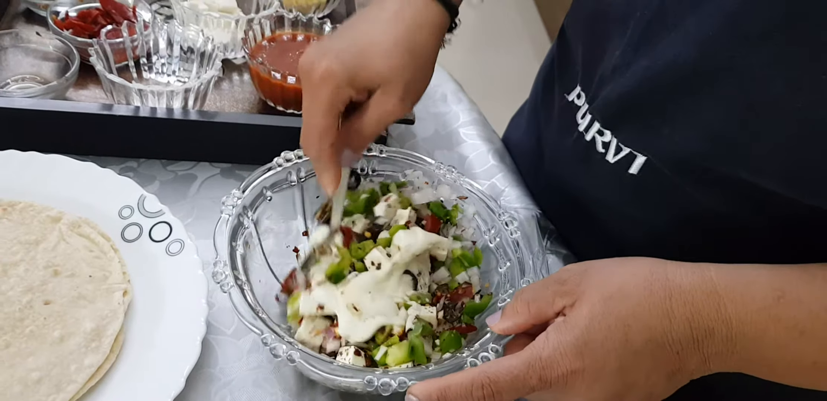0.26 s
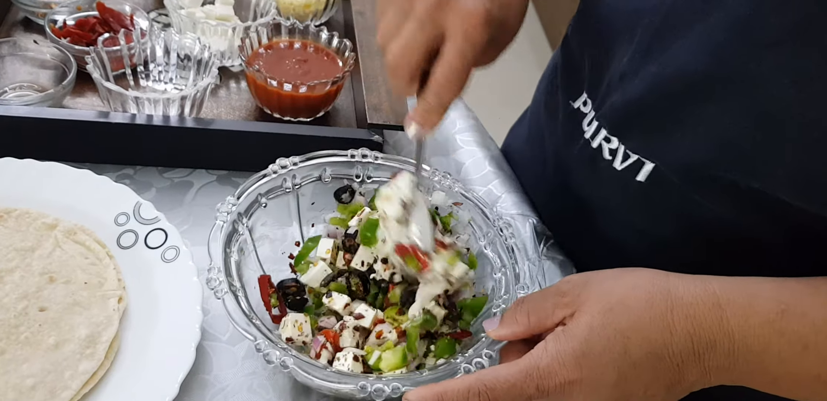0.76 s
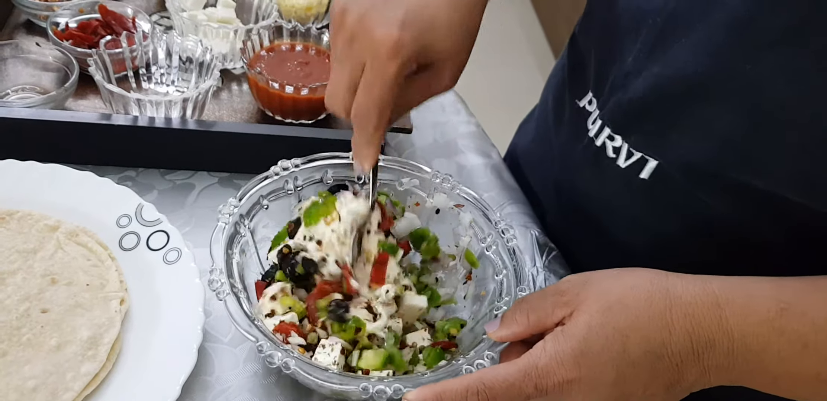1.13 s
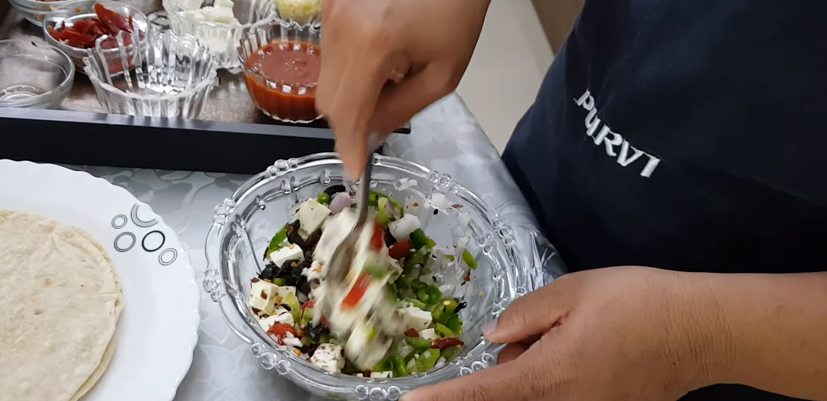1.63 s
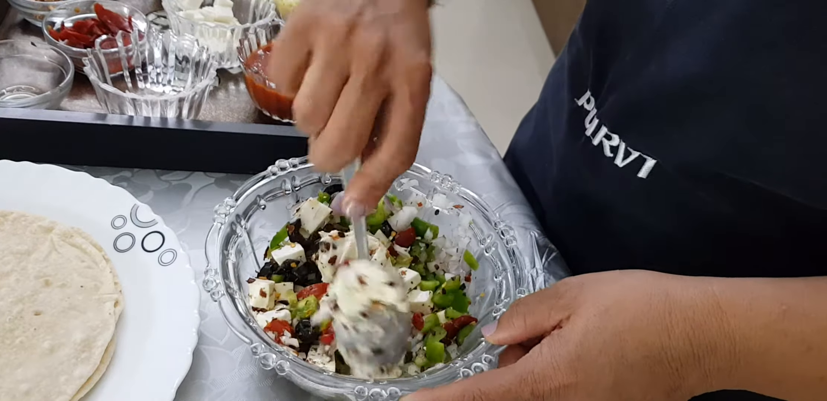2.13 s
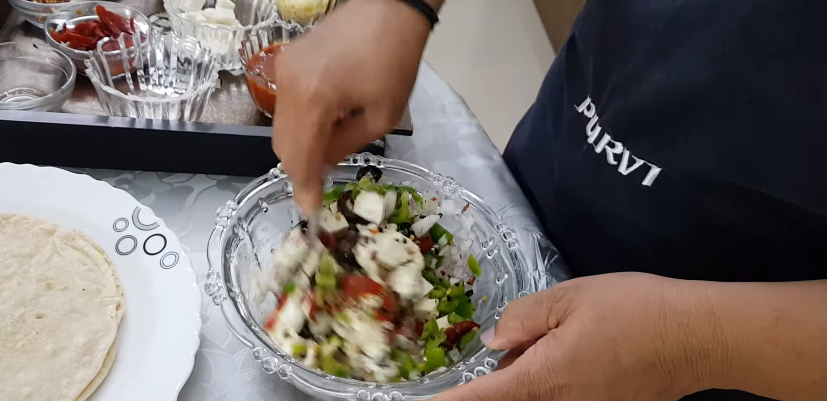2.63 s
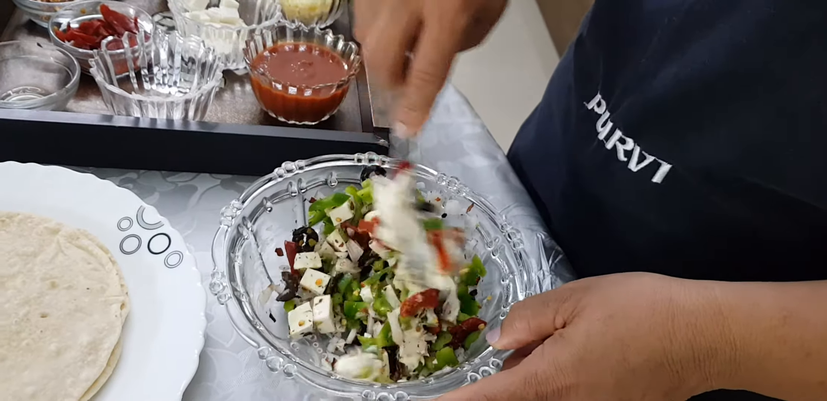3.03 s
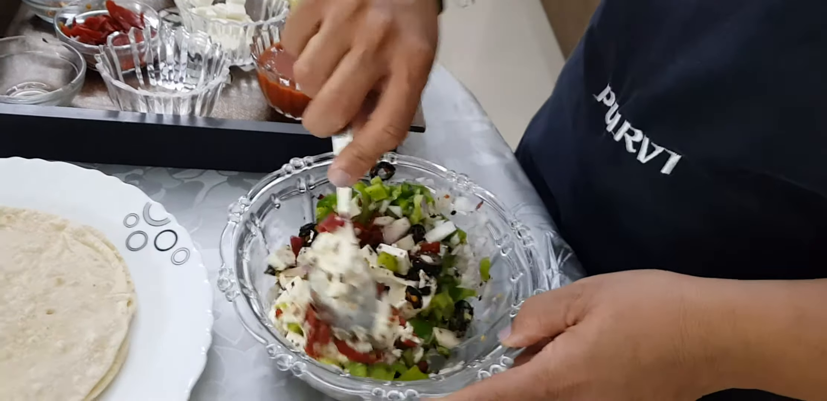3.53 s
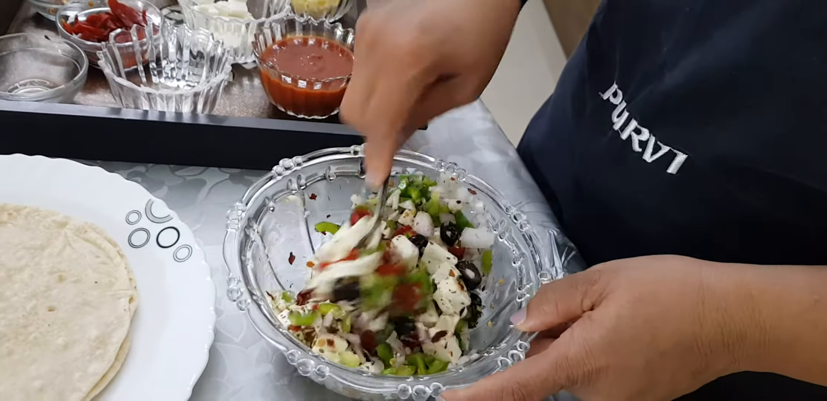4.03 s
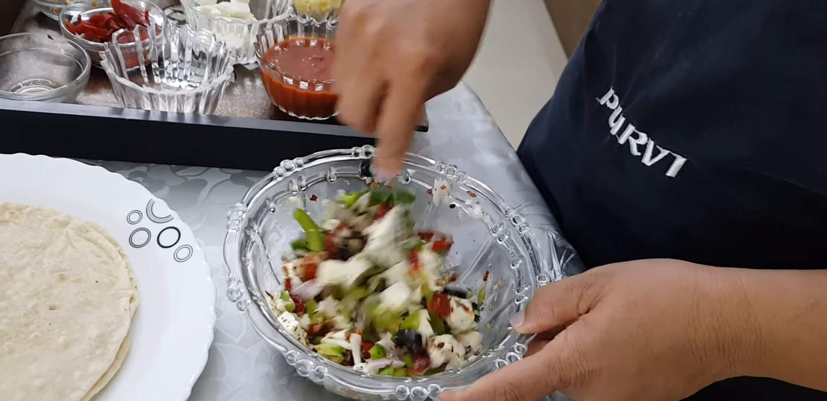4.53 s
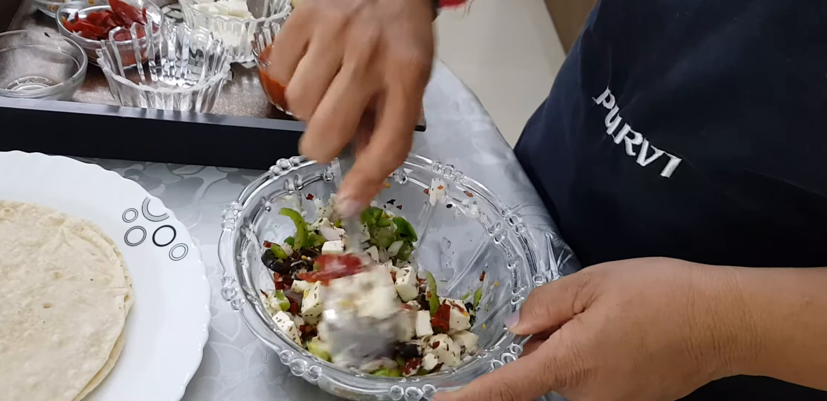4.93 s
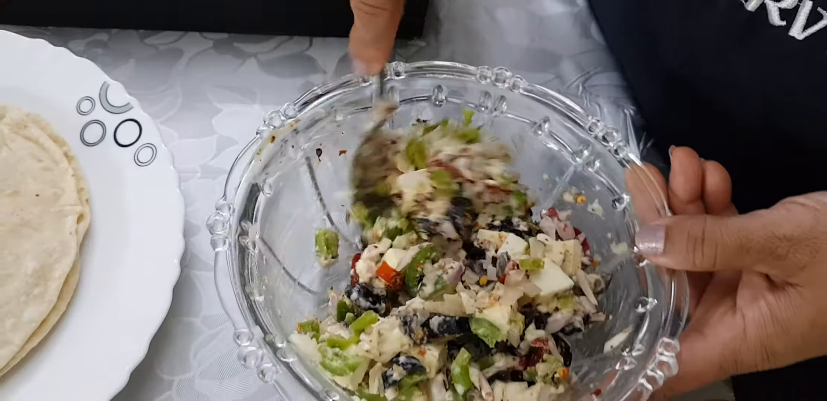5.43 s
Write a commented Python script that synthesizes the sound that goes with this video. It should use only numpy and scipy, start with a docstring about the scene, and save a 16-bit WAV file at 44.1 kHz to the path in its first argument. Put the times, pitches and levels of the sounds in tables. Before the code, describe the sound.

A metal spoon clinks irregularly against a glass bowl over faint wet mixing squelches in a bare, ringing kitchen, with one low microphone bump.

```python
"""Spoon clinks on a cut-glass bowl, damped by food and a hand, over wet squelches in a bare, ringing kitchen.
A steel spoon folds chopped vegetables and soft cheese: each clink sums struck modes of glass and steel and a noisy clack.
Filtered noise bursts make the counter knocks, wet smacks and one scrape; gated random pops make the squelch.
Noise echoes form the room, shaped noise its low drone and the hiss; microphone bumps are bass-cut, dying sines."""
import sys
import numpy as np
from scipy import signal
from scipy.fft import rfft, irfft, next_fast_len
from scipy.io import wavfile

SR = 44100
rng = np.random.default_rng(int(sys.argv[2]) if len(sys.argv) > 2 else 0)


def master_out(mix):
    """Clip the mix to full scale and print it as 16-bit PCM to the path in sys.argv[1]."""
    frames = np.transpose(np.atleast_2d(mix))
    ceiling = np.clip(frames, -1, 1)
    pcm = np.round(ceiling * 32767).astype(np.int16)
    wavfile.write(sys.argv[1], SR, pcm)


N = 249854
LEAD = SR // 10   # samples before time zero, so that a sound may already be under way
BLOW_T = np.arange(SR // 3) / SR   # time axis of one blow, s
BANDS = np.geomspace(100, 16000, 64)   # Hz

# Spoon strokes through the wet mix. Each row: middle in seconds, half length in seconds, level in dB.
STROKES = [(0.972, 0.086, -59.5), (1.423, 0.1, -65.5), (2.37, .18, -67.5), (2.658, 0.038, -60.5),
           (3.244, 0.087, -61.5), (3.653, 0.036, -61), (4.053, .075, -65.5), (4.922, .072, -64.5),
           (5.341, .025, -55.5)]
# Colour of the wet mix. Each row: frequency in Hz, relative level in dB per Hz.
SQUELCH = [(500, -7.5), (1500, 3.5), (2800, -11), (4000, -6.5), (5700, -4.5), (7700, -9), (9700, -5.5),
           (13000, -7.5), (16000, -12)]


def from_db(db):
    """Decibels to gain."""
    return 10 ** (np.asarray(db) / 20)


def at_hz(points, hz):
    """Read a table on a log-frequency axis."""
    f, value = np.transpose(points)
    return np.interp(np.log(np.maximum(hz, 1)), np.log(f), value)


def unit_energy(x):
    """Scale each channel to an energy of one."""
    return x / np.sqrt(np.sum(x ** 2, axis=-1, keepdims=True) / SR + 1e-30)


def unit_rms(x):
    """Scale to an rms of one over all channels."""
    return x / np.sqrt(np.mean(x ** 2) + 1e-30)


def dying(t, t60):
    """Envelope that falls 60 dB in t60 seconds."""
    return np.exp(-np.log(1000) * t / t60)


def pan(db):
    """Left and right gains for a left-minus-right level difference."""
    return from_db([[db / 2], [-db / 2]])


def add(track, s, sound):
    """Mix a sound at s seconds into a track that starts LEAD samples before time zero."""
    i = max(LEAD + round(s * SR), 0)
    track[:, i:i + sound.shape[-1]] += sound[:, :track.shape[1] - i]


def favour(hz, centre_hz, octaves):
    """A bell over log frequency, one at its centre."""
    return np.exp(-(np.log2(hz / centre_hz) / octaves) ** 2 / 2)


def shaded(spectrum, extra_db):
    """A spectrum with extra decibels on each of the BANDS."""
    return np.column_stack([BANDS, at_hz(spectrum, BANDS) + extra_db])


def colour(x, spectrum):
    """Causal (minimum-phase) filter with the given spectrum, built by folding its cepstrum."""
    n = 2 * next_fast_len(x.shape[-1] // 2 + 2048)
    gain = from_db(at_hz(spectrum, np.fft.rfftfreq(n, 1 / SR)))
    cepstrum = irfft(np.log(gain))
    cepstrum[1:n // 2] *= 2
    cepstrum[n // 2 + 1:] = 0
    response = np.exp(rfft(cepstrum))
    return irfft(rfft(x, n) * response)[..., :x.shape[-1]]


def diffuse_noise(size):
    """Frequencies and stereo spectrum of noise from all sides: alike in the bass, unrelated in the treble."""
    # Each row: frequency in Hz, left-right likeness from 0 to 1.
    likeness = [(30, 0.74), (130, 0.91), (290, 0.91), (640, 0.58), (1400, 0), (16000, 0)]
    hz = np.fft.rfftfreq(size, 1 / SR)
    alike = np.clip(at_hz(likeness, hz), -1, 1)
    mid, side = rfft(rng.standard_normal((2, size)))
    shared, opposed = np.sqrt(1 + alike) * mid, np.sqrt(1 - alike) * side
    return hz, (shared + opposed * [[1], [-1]]) / np.sqrt(2)


def burst(spectrum, t60, rise_s=0.00037):
    """A short coloured noise crack of unit energy."""
    size = SR // 8
    t = BLOW_T[:size]
    noise = irfft(diffuse_noise(size)[1], size)
    cracked = noise * dying(t, t60) * (1 - np.exp(-t / rise_s))
    return unit_energy(colour(cracked, spectrum))


def ring(modes, extra_db, contact_s, damping=1):
    """Struck modes; each reaches the two microphones with its own phase and strength."""
    spread_db = 1.2
    hz, db, t60 = np.transpose(modes)
    waves = unit_energy(dying(BLOW_T, t60[:, None] / damping)) * np.exp(2j * np.pi * hz[:, None] * BLOW_T)
    strength = from_db(db + extra_db + spread_db * rng.standard_normal((2, len(hz))))
    phase = np.exp(2j * np.pi * rng.random((2, len(hz))))
    soft_start = 1 - np.exp(-(BLOW_T / contact_s) ** 2)
    return np.sqrt(2) * ((strength * phase) @ waves).imag * soft_start


def clinks():
    """Touches ring bowl and spoon and clack; force and rim brighten, the spot favours a band, one band is weaker."""
    # Spoon meets glass. Each row: start in seconds, strength in dB, spoon ring against bowl ring in dB,
    # extra for the rim mode in dB, band the spot favours in Hz, band in which this clink's rings are weaker, in Hz.
    touches = [(-0.030, -38, -15, 7.5, 4850, 2720), (0.087, -63, 22, 10, 4200, 12500),
               (1.371, -65.5, 4.5, -18, 3400, 8490), (1.708, -33, -23, -6, 4500, 3504),
               (2.226, -56, -20, 1, 9800, 2700), (2.404, -70.5, 17, 4, 2088, 4150),
               (3.715, -54, -17, -3, 5100, 2750), (3.748, -41, 10, 4, 4100, 6480),
               (4.5183, -39, 10, -1, 1756, 9100), (5.014, -41, -11, 14, 10400, 2450),
               (5.022, -49, -18, 20, 10300, 6850), (5.1291, -51.5, -10, 1, 4800, 6850),
               (5.2771, -62.5, -2, 3, 2200, 8420)]
    # Glass bowl, then finger-damped spoon. Each row: mode in Hz, relative energy in dB, t60 in seconds
    # (the bowl's before the pressing spoon shortens it).
    bowl_modes = [(723, -25.5, 0.095), (1067.5, -15, 0.17), (1930, -22, .025), (2180, -37.5, .025),
                  (2720, -3.5, 0.079), (3690, -29.5, .025), (4880, -15.5, .07), (4878, -9, 0.042),
                  (5590, -17, .012), (6850, -14, .05), (9446, -10.5, 0.047), (10030, -18.5, 0.02),
                  (8964, -18.5, 0.023), (9980, -15.5, .022), (10550, -19, .035), (10960, -26, 0.018),
                  (11830, -20, 0.03), (13400, -19.5, .012), (14900, -18.5, .01), (15700, -27.5, .03)]
    spoon_modes = [(1284, -19, 0.092), (1880, -12.5, 0.013), (2715, -18.5, .006), (4122, -6, 0.019),
                   (4500, -14, 0.01), (6300, -21, 0.0051), (8410, -7.5, .005), (9220, 1.5, 0.01),
                   (12260, -26, 0.0092), (13670, -13.5, .004)]
    # Dead clack of the contact. Each row: frequency in Hz, relative level in dB per Hz.
    clack_colour = [(100, -15.5), (300, -16.5), (700, -9.5), (1100, 2.5), (1500, -8.5), (1950, -3.5),
                    (2600, -8), (3200, -11), (4500, -6), (6000, -9), (9000, -18), (13000, -17.5),
                    (16000, -35)]
    # Drift of the clinks to the right. Each row: time in seconds, left-minus-right level in dB.
    drift = [(1.7, 2.5), (3.7, -1.5), (5.3, -2)]
    firm_db = -41   # strength of a firm clink
    tilt_db_per_oct, tilt_per_force_db, tilt_per_rim_db = 1.0, 0.065, 0.12
    firm_spot_db, spot_per_force_db = 7, .14   # the favoured band grows as a touch gets lighter
    weaker_db = -8
    clack_bowl_db, clack_spoon_db = -4.5, 1   # a firm clink's clack against each ring
    clack_follows = 0.8   # share of the rings' dB swing that the clack follows

    out = np.zeros((2, LEAD + N))
    bowl_hz, spoon_hz = np.array(bowl_modes)[:, 0], np.array(spoon_modes)[:, 0]
    rim_mode = np.arange(len(bowl_modes)) == 1
    for s, db, spoon_db, rim_db, spot_hz, weaker_hz in touches:
        force_db, pressed = db - firm_db, from_db(spoon_db)
        bowl, spoon = from_db(db) * np.array([1, pressed]) / np.hypot(1, pressed)
        clack = np.hypot(bowl * from_db(clack_bowl_db), spoon * from_db(clack_spoon_db))
        clack = clack * from_db((clack_follows - 1) * force_db)
        bright_db = tilt_db_per_oct + tilt_per_force_db * force_db + tilt_per_rim_db * rim_db
        spot_db = firm_spot_db - spot_per_force_db * force_db
        bowl_tone, spoon_tone, clack_tone = (
            bright_db * np.log2(hz / 4500) + spot_db * favour(hz, spot_hz, octaves=0.12)
            for hz in (bowl_hz, spoon_hz, BANDS))
        bowl_dip, spoon_dip = (weaker_db * favour(hz, weaker_hz, octaves=0.12) for hz in (bowl_hz, spoon_hz))
        damping = 1 + 1.5 * pressed   # a spoon that stays pressed on the glass chokes its ring
        bowl_extra = bowl_tone + bowl_dip + rim_db * rim_mode
        glass = bowl * ring(bowl_modes, bowl_extra, contact_s=0.00047, damping=damping)
        steel = spoon * ring(spoon_modes, spoon_tone + spoon_dip, contact_s=0.00029)
        sides = pan(np.interp(s, *np.transpose(drift)))
        add(out, s, (glass + steel) * sides)
        add(out, s, clack * burst(shaded(clack_colour, clack_tone), t60=0.022) * sides)
    return out


def knocks():
    """The foot of the rocking bowl comes down on the counter: short, dull noise bursts."""
    # Each row: start in seconds, energy in dB.
    landings = [(1.371, -64), (1.800, -47.5), (3.863, -65)]
    # Each row: frequency in Hz, relative level in dB per Hz.
    knock_colour = [(50, -17), (120, -16), (300, -2), (500, -6.5), (750, 7), (1200, -5.5), (2500, -24),
                    (8000, -34.5)]
    out = np.zeros((2, LEAD + N))
    for s, db in landings:
        add(out, s, from_db(db) * burst(knock_colour, t60=0.01))
    return out


def squelch(grains_per_band_s, size_db):
    """Wet pieces part in tiny pops, each in one of twelve pitch bands, under every stroke."""
    t = np.arange(-LEAD, N) / SR
    push = sum(from_db(db) * np.exp(-((t - s) / half) ** 2 / 2) for s, half, db in STROKES)
    edges = np.geomspace(1000, 16000, 13)   # Hz
    pops = np.zeros((2, len(t)))
    for low, high in zip(edges, edges[1:]):
        born = rng.random(len(t)) < grains_per_band_s / SR
        sizes = from_db(size_db * np.minimum(rng.exponential(1, len(t)), 4))
        sizes = sizes * rng.standard_normal((2, len(t)))
        band = signal.butter(2, [low, high], "band", fs=SR, output="sos")
        pops += signal.sosfilt(band, born * sizes + 1e-18)
    return push * unit_rms(colour(pops, SQUELCH))


def wet_burst(hz, t60, boost_db):
    """A noise burst with the colour of the wet mix and one narrow resonance."""
    return burst(shaded(SQUELCH, boost_db * favour(BANDS, hz, octaves=0.076)), t60)


def smacks(count):
    """Air pockets in the mix open: some at set times, others at random around every stroke."""
    # Wet smacks at set times. Each row: start in seconds, energy in dB, pitch in Hz.
    timed = [(0.943, -73.5, 6340), (1.35, -68, 6900), (1.545, -75, 6540), (2.581, -78.5, 9170),
             (3.119, -83, 12750), (3.192, -78.5, 4500), (4.023, -73, 11540)]
    stray_db = -20   # energy against the level of the stroke
    stray_spread = 0.99   # scatter in half lengths of the stroke
    low_hz, high_hz = 4000, 11010
    out = np.zeros((2, LEAD + N))
    strays = [(s + stray_spread * half * rng.standard_normal(), db + stray_db, rng.uniform(low_hz, high_hz))
              for s, half, db in STROKES for _ in range(count)]
    for s, db, hz in timed + strays:
        add(out, s, from_db(db) * wet_burst(hz, t60=.016, boost_db=8))
    return out


def scrape():
    """The spoon slides once along wet glass and hisses in two narrow bands."""
    # Each row: band in Hz, energy in dB.
    hissing_bands = [(5480, -74), (9700, -73.5)]
    out = np.zeros((2, LEAD + N))
    for hz, db in hissing_bands:
        add(out, 2.635, from_db(db) * wet_burst(hz, t60=0.27, boost_db=19))
    return out


def bumps(highpass_hz, left_db):
    """Pushes on the microphone case, mostly at the right port; a bass cut turns each into a dying wobble."""
    # Each row: start in seconds, peak in dB, pitch of the push in Hz.
    pushes = [(3.2885, -13, 232), (3.299, -19.5, 100), (3.327, -20, 102), (3.34, -15, 65.6),
              (3.3624, -8.5, 157), (3.818, -32.5, 69.5), (4.021, -42.5, 68)]
    # The case's own dull click. Each row: frequency in Hz, relative level in dB per Hz.
    tick_colour = [(100, 0.5), (300, -2.5), (500, -3.5), (750, 0), (1200, -24), (2500, -30.5),
                   (6000, -26.5), (9000, -40.5), (15000, -36)]
    # click against the push at this pitch; quicker pushes click harder
    tick_db, tick_at_hz, tick_db_per_oct = -44, 157, 10
    out = np.zeros((2, LEAD + N))
    bass_cut = signal.butter(5, highpass_hz, "high", fs=SR, output="sos")
    tick = unit_energy(colour(signal.unit_impulse(len(BLOW_T)), tick_colour))
    for s, db, push_hz in pushes:
        phase = 2 * np.pi * push_hz * BLOW_T
        wobble = signal.sosfilt(bass_cut, np.sin(phase) * np.exp(-.45 * phase) + 1e-18)
        add(out, s, from_db(db) * wobble / np.abs(wobble).max() * from_db([[left_db], [0]]))
        click_db = db + tick_db + tick_db_per_oct * np.log2(push_hz / tick_at_hz)
        add(out, s, from_db(click_db) * tick * pan(db=-6.5))
    return out


def kitchen(x, build_s, early_db, early_t60):
    """Early scatter off counter and dishes, then a diffuse tail that dies soonest in the top treble."""
    # Each row: frequency in Hz, t60 in seconds.
    decays = [(100, 0.74), (500, 0.7), (1200, 0.84), (2700, 0.84), (5000, 0.82), (9000, 0.63),
              (16000, 0.14)]
    # Each row: frequency in Hz, tail level against the direct sound in dB.
    tail_levels = [(100, 3), (500, 2.5), (1200, -2.5), (2700, -4), (5000, -8), (9000, -12), (16000, -1)]
    t = np.arange(SR) / SR
    hz, noise = diffuse_noise(SR)
    centres, tail = [f for f, t60 in decays], 0
    for share, (f, t60) in zip(np.eye(len(centres)), decays):   # overlapping bands, each with its own decay
        weight = at_hz(list(zip(centres, share)), hz)
        band = irfft(noise * weight * from_db(at_hz(tail_levels, hz)), SR)
        tail = tail + band * unit_energy(dying(t, t60) * (1 - np.exp(-t / build_s)))
    early = from_db(early_db) * unit_energy(rng.standard_normal((2, SR)) * t * dying(t, early_t60))
    feed = np.array([x[0] + 0.68 * x[1], x[1] + 0.74 * x[0]])   # each side also hears the other
    return signal.fftconvolve(feed, (tail + early) / np.sqrt(SR), axes=1)


def drone():
    """Steady low rush of the room: shaped noise with a few resonances."""
    # Each row: frequency in Hz, relative level in dB per Hz.
    rush_colour = [(15, -56), (25, -44.5), (54, -4.5), (86, -12.5), (190, -5), (224, -6.5), (365, -8),
                   (558, -6), (606, -9), (1600, -13), (2560, -28.5), (2890, -33), (3200, -41), (4160, -78),
                   (7040, -120)]
    # Each row: centre in Hz, width in Hz, height in dB.
    resonances = [(64.4, 24, 1.5), (111.9, 28, 12.5), (197.4, 9.4, 6.5), (342, 120, 7), (1072, 200, 4)]
    hz, noise = diffuse_noise(LEAD + N)
    peaks_db = sum(db / (1 + (2 * (hz - centre) / width) ** 2) for centre, width, db in resonances)
    rush = unit_rms(irfft(noise * from_db(at_hz(rush_colour, hz) + peaks_db), LEAD + N))
    return from_db(-52) * rush * pan(db=-1)


def hiss():
    """Faint microphone hiss: coloured noise, unrelated at the two sides."""
    # Each row: frequency in Hz, relative level in dB per Hz.
    hiss_colour = [(500, -13), (3200, -2), (4400, -7.5), (6200, 0.5), (7700, -7.5), (9800, 2.5), (12500, 2),
                   (16000, 0)]
    return from_db(-70.5) * unit_rms(colour(rng.standard_normal((2, LEAD + N)), hiss_colour))


def scene():
    """Bowl sounds in the room, over drone and hiss; the bumps reach the microphone directly."""
    near = clinks() + knocks() + squelch(grains_per_band_s=4000 / 13, size_db=-1.5) + smacks(count=2) + scrape()
    room = np.zeros_like(near)
    # the echo noise is drawn anew for each second, so no chance peak repeats
    for start in range(0, LEAD + N, SR):
        echoes = kitchen(near[:, start:start + SR], build_s=0.0029, early_db=-14.0, early_t60=0.039)
        add(room, (start - LEAD) / SR, echoes)
    return (near + room + drone() + hiss() + bumps(highpass_hz=47.3, left_db=-37))[:, LEAD:]


def record(dry):
    """A steep elliptic low-pass cuts the top above 16 kHz."""
    return signal.sosfilt(signal.ellip(10, .1, 80, 16000, fs=SR, output="sos"), dry)


dry = scene()
out = record(dry)
master_out(out)
```